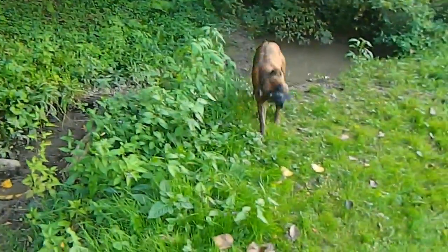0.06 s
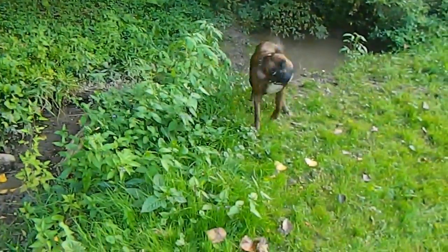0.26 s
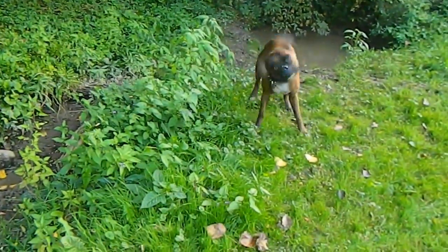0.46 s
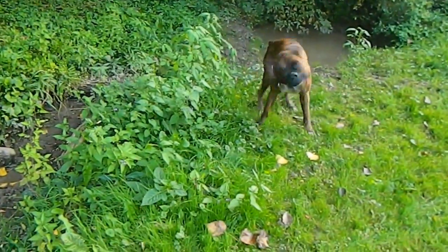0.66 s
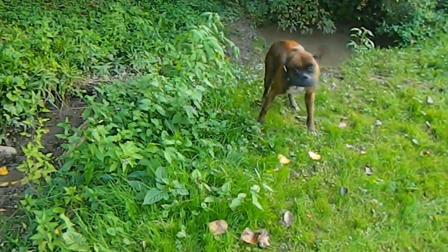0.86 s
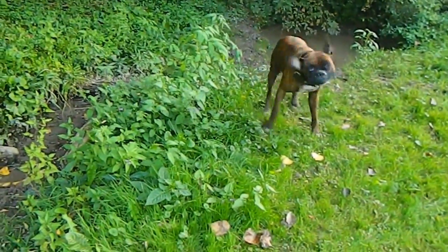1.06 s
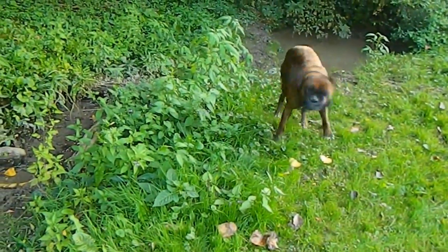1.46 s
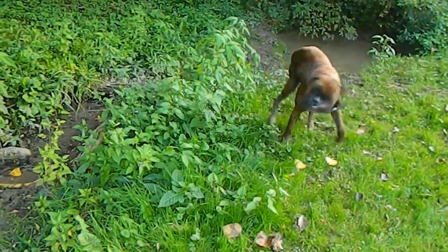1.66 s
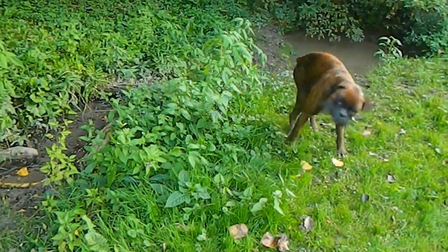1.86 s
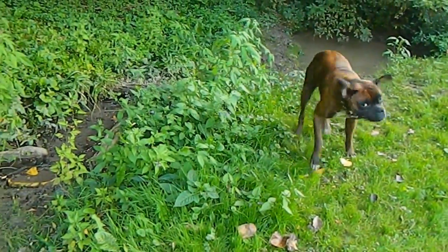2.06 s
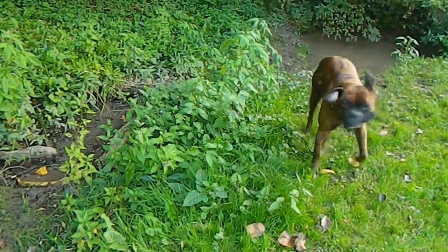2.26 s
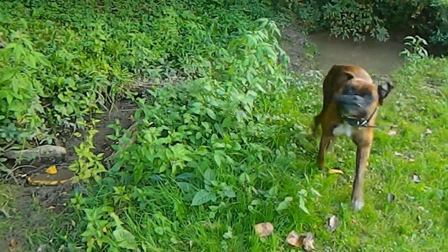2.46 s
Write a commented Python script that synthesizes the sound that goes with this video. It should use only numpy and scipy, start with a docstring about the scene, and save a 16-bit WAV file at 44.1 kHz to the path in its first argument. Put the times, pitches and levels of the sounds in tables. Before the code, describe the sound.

Quick flapping slaps of a dog shaking its head outdoors, collar tags clinking faintly.

```python
"""A dog shakes its head on a lawn, about five swings a second. At each turn ears and lips slap the
skull and expel trapped air in short pulses; the ear tips crack like whips, the coat swishes by
friction and the collar tags ring in their natural modes. A wet pop of the jowls ends the shake.
The ground reflects the sound and the bushes scatter it; behind it lies a low outdoor rumble."""
import sys
import numpy as np
from scipy import signal
from scipy.fft import rfft, irfft, next_fast_len
from scipy.io import wavfile
from scipy.ndimage import uniform_filter1d, map_coordinates

SR = 44100
rng = np.random.default_rng(int(sys.argv[2]) if len(sys.argv) > 2 else 0)


def to_wav(s):
    """Save 16-bit WAV."""
    ch = np.atleast_2d(s).T  # columns
    pcm = np.round(np.clip(ch, -1, 1) * 32767)  # PCM
    wavfile.write(sys.argv[1], SR, pcm.astype(np.int16))


N = 110250
T = np.arange(SR // 4) / SR  # time axis of one short event [s]

# spectrum of the outdoor rumble (frequency [Hz], level [dB])
RUMBLE_SPECTRUM = [(25, -39), (45, -15.5), (75, 1.5), (105, 4.5), (150, -1.5), (280, -14), (500, -11.5),
                   (1500, -41), (4000, -22.5), (8000, -21.5), (16000, -42)]
# likeness of the noise at left and right (frequency [Hz], correlation [0..1])
STEREO_COHERENCE = [(60, 0.89), (500, 0.61), (2000, 0.71), (5000, 0.58), (12000, 0.13)]
# sound scattered sideways by leaves (frequency [Hz], side over mid [dB])
LEAF_WIDTH = [(300, -38), (1500, -26), (3000, -23), (6000, -8.5), (12000, -3)]
# envelope of the rustle of fur and grass (time [s], level [dB])
RUSTLE_ENVELOPE = [(0, -52), (.12, -49.5), (.22, -43.5), (.34, -42.5), (.9, -45.5), (1.3, -44.5),
                   (1.75, -41), (1.9, -47), (2.2, -42.5), (2.5, -45)]
# spectrum of that rustle (frequency [Hz], level [dB])
RUSTLE_SPECTRUM = [(150, -24), (450, 6), (1000, 1.5), (3000, -1), (6000, -10), (16000, -19)]
# natural modes of the large tag, the small tag and the ring (frequency [Hz], level [dB], T60 [s])
METAL_MODES = {"large": [(4071, -7.5, 0.12), (6180, -4, 0.091), (9210, -7.5, 0.25), (14000, -24, 0.13),
               (15400, -12, 0.11)], "small": [(9680, -0.5, 0.12), (14200, -15, 0.11)],
               "ring": [(5600, -6, 0.059), (6070, -5, 0.099), (10850, -13.5, 0.3), (14800, -22, 0.088)]}
# impacts on the collar's metal (time [s], level [dB], struck piece [name])
TAG_CLINKS = [(0.174, -33.5, "ring"), (0.211, -26.5, "small"), (0.323, -29.5, "ring"),
              (0.81, -33.5, "small"), (1.022, -31, "ring"), (1.184, -39, "small"), (1.255, -31.5, "ring"),
              (1.364, -22.5, "ring"), (1.484, -31, "ring"), (1.684, -26, "ring"), (1.772, -27, "large"),
              (1.947, -20, "large"), (2.019, -35, "ring"), (2.142, -32, "small"), (2.26, -34.5, "small"),
              (2.285, -30, "ring"), (2.418, -31.5, "ring")]
# short chinks of the collar's links (time [s], level [dB])
LINK_CHINKS = [(0.329, -22.5), (1.4195, -22), (1.812, -26.5), (2.143, -29), (2.285, -29), (2.432, -30)]
# pops of air trapped under ears, lips and jowls (time [s], level [dB], pitch [Hz])
AIR_POPS = [(.128, -36.5, 850), (0.2343, -12.5, 2530), (0.3367, -16, 1404), (.585, -31, 1110),
            (0.6474, -16, 705), (1.6958, -17, 2960), (1.7575, -13, 1770), (1.9298, -24, 1020),
            (2.116, -37, 495), (2.2196, -10.5, 798), (2.392, -37, 830)]
# whip cracks of the ear tips (time [s], level [dB])
EAR_CRACKS = [(0.328, -27.5), (0.4434, -18.5), (.542, -19), (0.6524, -18), (0.8524, -15), (0.9655, -32.5),
              (0.987, -27), (1.3624, -25), (1.3739, -17), (1.482, -27.5), (1.774, -20)]
# spectrum of a crack (frequency [Hz], level [dB])
CRACK_SPECTRUM = [(300, -33), (1200, -1), (3500, -9.5), (7000, 3), (10000, -2.5), (16000, -25)]
# hollow claps of the cheeks (time [s], level [dB], pitch [Hz])
CHEEK_CLAPS = [(0.237, -22, 496), (.340, -18.5, 430), (0.4405, -16.5, 470), (.524, -25.5, 655),
               (.541, -17.5, 490), (.641, -20, 407), (0.7284, -14.5, 570), (0.749, -17.5, 437),
               (.840, -22, 650), (.850, -21.5, 490), (0.9429, -26.5, 590), (1.1305, -26, 593),
               (1.2245, -24.5, 432), (1.2995, -20, 510), (1.375, -16.5, 670), (1.4654, -15, 640),
               (1.479, -24.5, 546), (1.5629, -13.5, 580), (1.573, -23.5, 480), (1.651, -19.5, 300),
               (1.665, -31, 390), (1.757, -15, 770), (1.836, -25, 550), (1.845, -27, 268),
               (2.0185, -27, 660)]
# slaps of ears and lips (time [s], level [dB], pitch of the trapped air [Hz], flutter level [dB])
SKIN_SLAPS = [(0.2355, -19.5, 1680, -13), (0.3248, -7.5, 1550, -22), (.3395, -3, 1185, -7),
              (0.4415, -14, 1460, -13), (0.5416, -15, 1350, -11.5), (0.6257, -23, 1900, -21),
              (.6470, -10, 1600, -12), (0.7482, -11.5, 1280, -12.5), (0.8141, -33, 2900, -19),
              (0.8537, -15.5, 1740, -14.5), (0.955, -21.5, 1580, -26), (0.9639, -21.5, 1720, -23),
              (1.025, -37, 3120, -22), (1.0595, -9.5, 1310, -17), (1.129, -37, 1990, -21.5),
              (1.1455, -19.5, 1710, -17), (1.2175, -14, 2390, -20), (1.2227, -20, 2110, -11),
              (1.2852, -18, 2980, -17), (1.3003, -16, 1400, -21), (1.3655, -12, 2480, -15),
              (1.3758, -8.5, 1990, -16.5), (1.4743, -20, 1025, -13.5), (1.4793, -11.5, 1640, -18.5),
              (1.5721, -12.5, 1590, -9.5), (1.648, -22, 835, -20), (1.6655, -3.5, 1410, -11),
              (1.7513, -51, 1640, -13), (1.7575, -1.5, 1780, -37), (1.835, -24.5, 1150, -29),
              (1.8524, -16.5, 1690, -13.5), (1.9325, -13.5, 2460, -30), (2.0191, -36, 1910, -31),
              (2.34, -56, 1850, -27.5)]


def amp(db):
    """Amplitude ratio of a level in decibels."""
    return 10 ** (np.asarray(db) / 20)


def unit(x):
    """Normalisation to an rms of 1."""
    return x / np.sqrt(np.mean(x ** 2) + 1e-20)


def along(points, hz):
    """Interpolation of (frequency, value) points on a logarithmic frequency axis."""
    frequencies, values = np.transpose(points)
    return np.interp(np.log(hz + 1), np.log(frequencies + 1), values)


def filtered(x, response):
    """Linear filtering: the spectrum of x is multiplied by a frequency response."""
    n = x.shape[-1]
    padded = next_fast_len(n + SR // 2)
    return irfft(rfft(x, padded) * response(np.fft.rfftfreq(padded, 1 / SR)), padded)[..., :n]


def decay(t60_s):
    """Exponential damping by 60 dB in t60_s."""
    return amp(-60 * T / t60_s)


def add(track, s, sound):
    """Superposition: a sound is added to the track at s seconds."""
    part = track[max(round(s * SR), 0):][:len(sound)]
    part += sound[:len(part)]


def stereo_noise(spectrum):
    """Partial coherence: coloured noise of rms 1, nearly alike on both sides in the bass."""
    def mid_and_side(hz):
        angle = np.arccos(np.clip(along(STEREO_COHERENCE, hz), -1, 1)) / 2
        return amp(along(spectrum, hz)) * [np.cos(angle), np.sin(angle)]
    mid, side = filtered(rng.standard_normal((2, N)), mid_and_side)
    return unit(np.array([mid + side, mid - side]))


def pulse(hz, cycles, chirp_per_s=0):
    """Monopole radiation: pressure is the derivative of a brief flow that swells for `cycles` periods."""
    t = T[:SR // 20]
    age = t * hz / cycles
    flow = (age * np.exp(1 - age)) ** 3 * np.sin(2 * np.pi * hz * t * (1 + chirp_per_s * t))
    return -np.gradient(flow) * SR / (2 * np.pi * hz)


def outdoor_rumble():
    """Stationary noise: a steady background with most of its power in the bass."""
    return amp(-46.5) * stereo_noise(RUMBLE_SPECTRUM)


def ground_and_bushes(x):
    """Reflection and scattering: the ground returns a dull copy, leaves add width, bushes a faint tail."""
    delay_s, reflection, dull_hz = .00172, .38, 6140
    x = filtered(x, lambda hz: 1 + reflection * np.exp(-2j * np.pi * hz * delay_s)
                 / (1 + (hz / dull_hz) ** 2))

    def scattered(t60_s):
        response = unit(rng.standard_normal(len(T)) * decay(t60_s)) / np.sqrt(len(T))
        return signal.fftconvolve(x, response)[:N]
    side = filtered(scattered(t60_s=.067), lambda hz: amp(along(LEAF_WIDTH, hz)))
    mid = x + amp(-17) * scattered(t60_s=.14)
    return np.array([mid + side, mid - side])


def coat_rustle():
    """Friction noise: fur and grass rustle in small patches of colour and swish with every slap."""
    rise_s, fall_s, crinkle_db = .0083, .0098, 4
    t = np.arange(N) / SR
    swishes = [amp(db / 2) * np.exp(-np.maximum((t - s) / fall_s, (s - t) / rise_s))
               for s, db, *_ in SKIN_SLAPS]
    envelope = amp(np.interp(t, *np.transpose(RUSTLE_ENVELOPE))) + amp(-25) * np.max(swishes, axis=0)
    spectrogram = signal.stft(stereo_noise(RUSTLE_SPECTRUM), nperseg=256)[2]
    patches = uniform_filter1d(rng.standard_normal(spectrogram.shape[1:]), size=6, axis=0)
    patches = unit(uniform_filter1d(patches, size=3, axis=1))  # smooth in frequency, then in time
    crinkle = signal.istft(spectrogram * amp(crinkle_db * patches), nperseg=256)[1][:, :N]
    return envelope * unit(crinkle)


def clink(struck):
    """Modal vibration: after a tick the struck piece rings and shakes its neighbours; loose ones chatter."""
    neighbour_db, scatter_db, detune = -13, 3, .005
    chatter_db, chatter_per_s = 5, 250
    knots_s = np.arange(chatter_per_s) / chatter_per_s
    scrape = unit(filtered(rng.standard_normal(len(T)), lambda hz: hz ** 2 / (hz ** 2 + 4500 ** 2)))
    out = amp(-7) * decay(t60_s=.055) * scrape
    for piece, modes in METAL_MODES.items():
        loose = piece != "large"
        flicker = np.interp(T, knots_s, rng.standard_normal(chatter_per_s))
        chatter = unit(amp(loose * chatter_db * flicker))
        for hz, mode_db, t60_s in modes:
            # a random walk of the phase broadens the spectral line
            drift = (.09 if loose else .045) * hz / 10000 * np.cumsum(rng.standard_normal(len(T)))
            phase = 2 * np.pi * hz * (1 + loose * detune * rng.normal()) * T + drift
            db = mode_db + neighbour_db * (piece != struck) + loose * scatter_db * rng.normal()
            out += amp(db) * decay(t60_s) * chatter * np.sin(phase)
    return out


def contact_envelope(db):
    """Contact damping: lighter clinks start more softly and are smothered sooner by the fur."""
    force = amp(db / 2)
    rise_s = .0001 / force
    return amp(db) * (1 - np.exp(-T / rise_s)) * decay(t60_s=6.3 * force)


def collar():
    """Inelastic impacts: each clink rattles on in weaker bounces; links chink and jingle in between."""
    bounce_s, bounce_db, jingles_per_s = .008, -5, 50
    out = np.zeros(N)
    for s, db, struck in TAG_CLINKS:
        for bounce, chance in enumerate(rng.random(size=3)):
            delay_s = bounce_s * bounce * (.5 + chance)
            add(out, s + delay_s, contact_envelope(db + bounce_db * bounce) * clink(struck))
    for s, db in LINK_CHINKS:
        add(out, s, amp(db) * pulse(hz=5520, cycles=6.6))
    for s in np.arange(TAG_CLINKS[0][0], N / SR, 1 / jingles_per_s):  # stray contacts follow the rustle
        db = np.interp(s, *np.transpose(RUSTLE_ENVELOPE)) - 3 + rng.uniform(-8, 8)
        onset_s = s + rng.random() / jingles_per_s
        add(out, onset_s, contact_envelope(db) * clink(rng.choice(["small", "ring"])))
    return out


def jowl_pops():
    """Cavity resonance: a pop clicks softly, then its air pocket rings with rising pitch."""
    out = np.zeros(N)
    for s, db, hz in AIR_POPS:
        cavity = pulse(hz, cycles=2.75, chirp_per_s=7.1)
        click = amp(-4) * pulse(2.4 * hz, cycles=.85)
        add(out, s, amp(db) * (cavity + click))
    return out


def ear_tip_cracks():
    """Whip action: an ear tip gives a broadband crack, then a short brush of fur."""
    envelope = decay(t60_s=.007) + amp(-18.5) * decay(t60_s=.15)
    out = np.zeros(N)
    for s, db in EAR_CRACKS:
        hiss = unit(filtered(rng.standard_normal(len(T)), lambda hz: amp(along(CRACK_SPECTRUM, hz))))
        add(out, s, amp(db) * hiss * envelope)
    return out


def skin_slaps():
    """Air displacement: each slap expels one sharp pulse amid smaller contacts; the cheeks clap lower."""
    slap_cycles, clap_cycles = .51, .85
    flutter_lead_s, flutter_spread_s, flutter_octaves = .002069, .003, .58
    low_cut_hz, high_cut_hz = 86, 6600
    out = np.zeros(N)
    for s, db, hz, flutter_db in SKIN_SLAPS:
        add(out, s - slap_cycles / hz / 2, amp(db) * pulse(hz, slap_cycles))
        for lag, pitch, size in rng.standard_normal((9, 3)):
            contact_hz = hz * 2 ** (flutter_octaves * np.tanh(pitch))
            contact = np.tanh(2 * size) / 2 * pulse(contact_hz, cycles=.85)
            add(out, s - flutter_lead_s + flutter_spread_s * abs(lag), amp(flutter_db) * contact)
    for s, db, hz in CHEEK_CLAPS:
        add(out, s - clap_cycles / hz / 2, amp(db) * pulse(hz, clap_cycles))

    def band_pass(hz):
        return (1j * hz / (low_cut_hz + 1j * hz)) ** 2 / (1 + 1j * hz / high_cut_hz)
    return amp(.5) * filtered(out, band_pass)


def scene():
    """Superposition: the dog, slightly right of centre, sounds over the distant rumble."""
    pan = amp([[-.5], [.5]])  # left, right [dB]
    head = ground_and_bushes(skin_slaps() + ear_tip_cracks()) + jowl_pops()
    return pan * head + coat_rustle() + outdoor_rumble() + pan * ground_and_bushes(collar())


def record(dry):
    """Saturation and band limiting: the hardest peak is rounded off and the highest treble removed."""
    ceiling, top_hz = .92, 15800
    rounded = dry / (1 + abs(dry / ceiling) ** 6) ** (1 / 6)
    return filtered(rounded, lambda hz: hz < top_hz)


dry = scene()
out = record(dry)
to_wav(out)
```